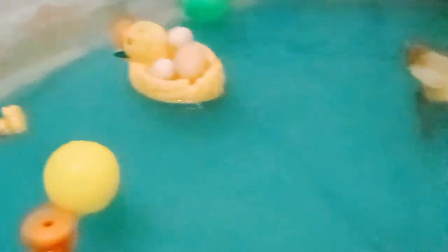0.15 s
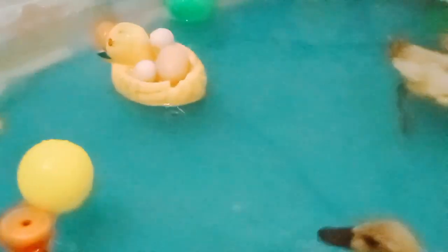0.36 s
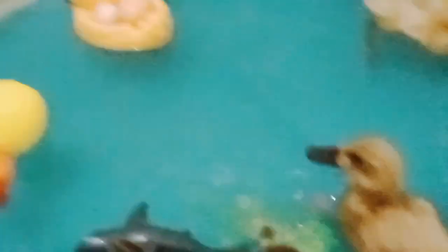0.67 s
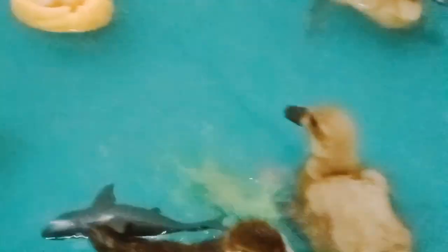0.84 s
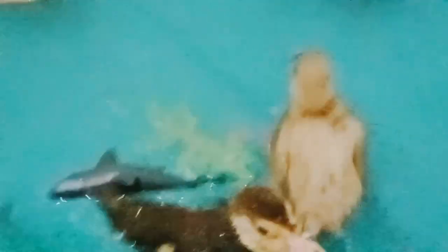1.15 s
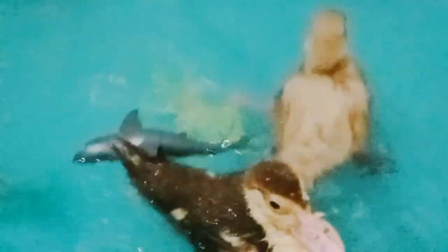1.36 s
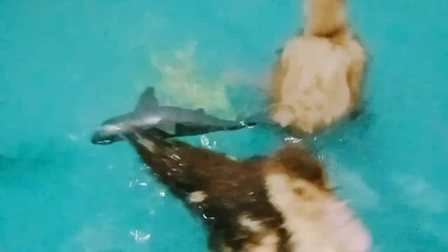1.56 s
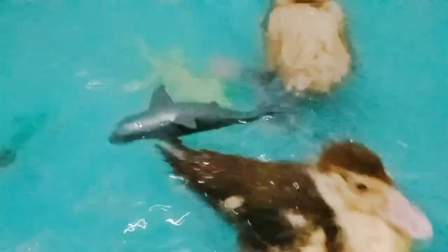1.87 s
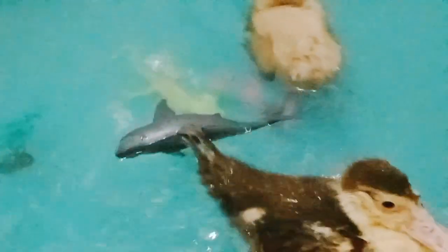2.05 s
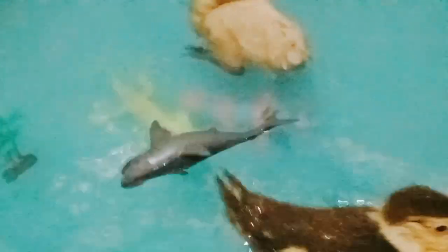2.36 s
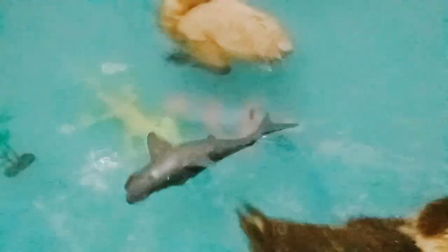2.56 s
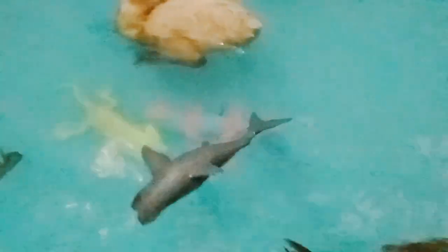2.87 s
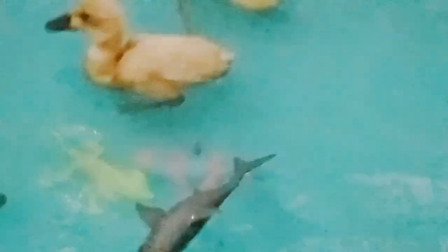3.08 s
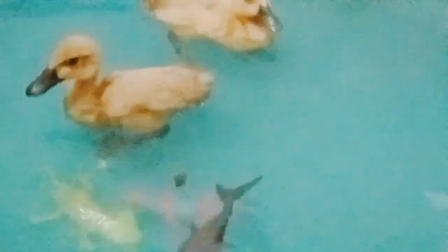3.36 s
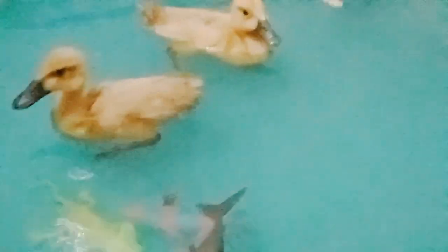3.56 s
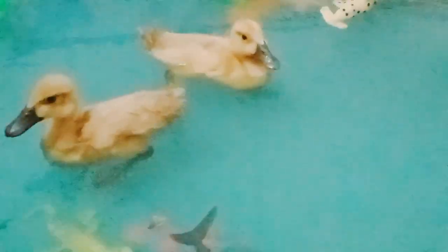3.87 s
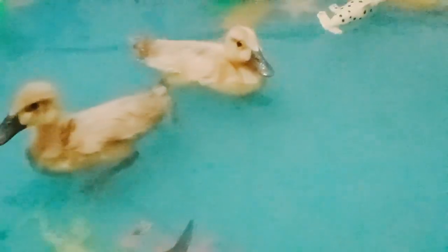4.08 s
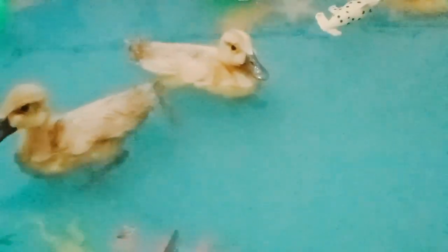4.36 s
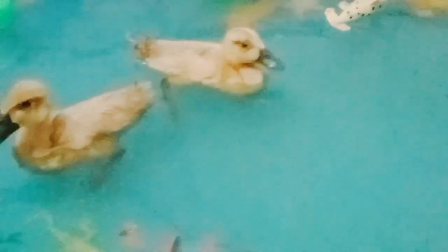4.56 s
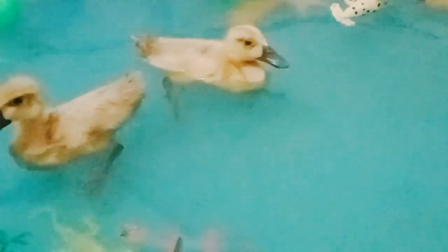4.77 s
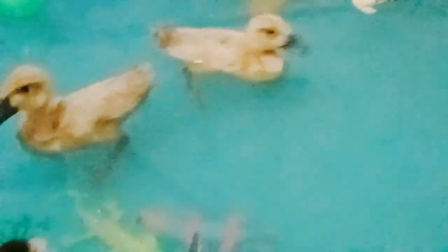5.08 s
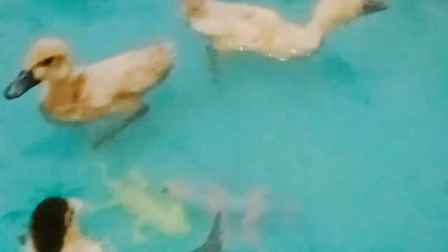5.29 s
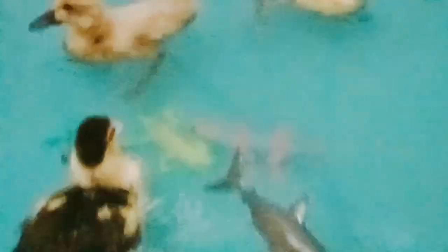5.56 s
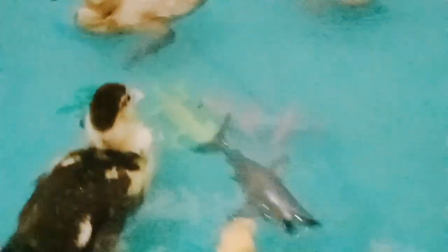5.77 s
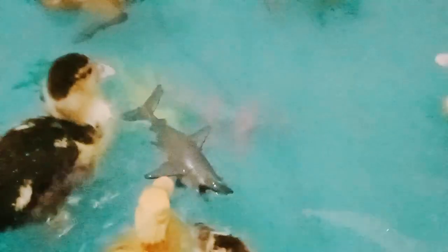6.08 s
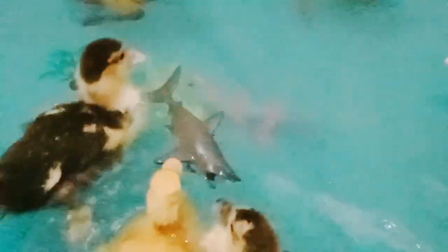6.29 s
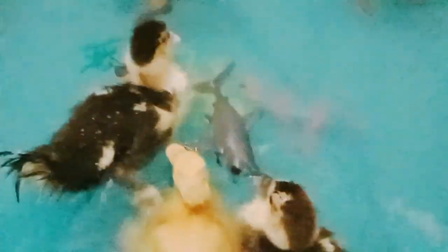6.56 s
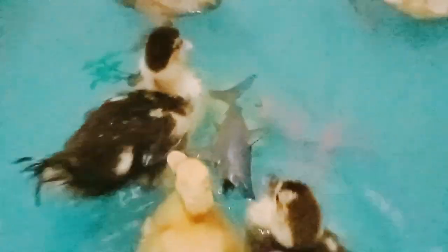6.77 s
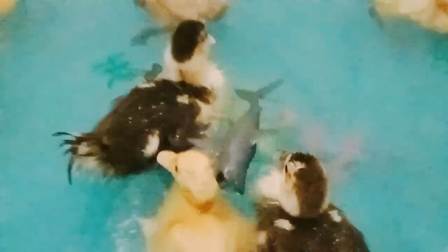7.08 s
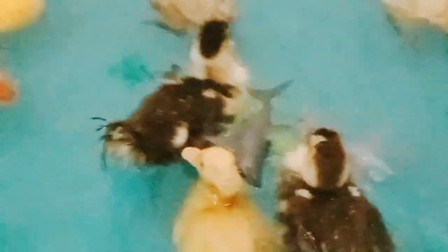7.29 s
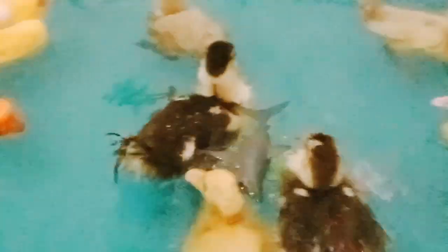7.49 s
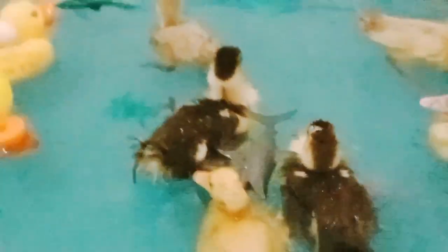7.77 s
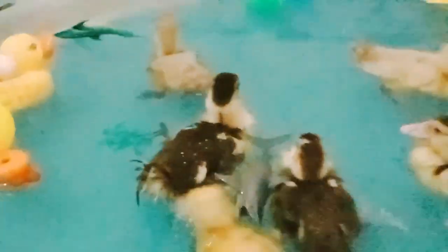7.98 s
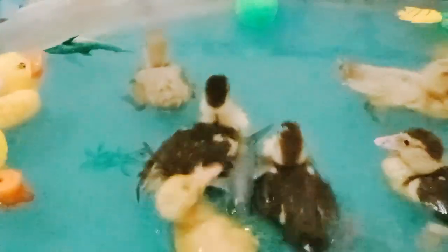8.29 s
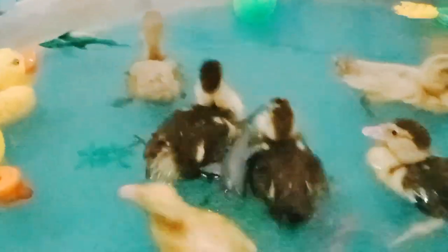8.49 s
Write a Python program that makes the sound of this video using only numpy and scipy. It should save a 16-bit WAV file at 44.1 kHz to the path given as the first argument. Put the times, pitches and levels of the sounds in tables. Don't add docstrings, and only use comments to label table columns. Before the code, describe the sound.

Ducklings paddle in a shallow plastic pool indoors, a metre or two from a phone. Quick thin chirps come first, with two sharp bill raps on the pool wall, then the peeping thickens and one near bird gives loud, regular piercing calls. Afterwards hoarse, doubled squeaks come farther apart and softer. Small water blips, dull handling thumps and a low room hum lie underneath, with a short hard reverb.

```python
import sys
import numpy as np
from scipy import signal
from scipy.fft import rfft, irfft, next_fast_len
from scipy.io import wavfile
from scipy.ndimage import uniform_filter1d, minimum_filter1d

SR = 44100
rng = np.random.default_rng(int(sys.argv[2]) if len(sys.argv) > 2 else 0)


def invert_db(level):
    return 10 ** (np.asarray(level, dtype=float) / 20)


def generate_wav(sig):
    pcm = np.round(np.clip(np.atleast_2d(sig).T, -1, 1) * 32767).astype(np.int16)
    wavfile.write(sys.argv[1], SR, pcm)


N = 381024
t = np.arange(N) / SR


def add(track, sound, s):
    i = int(s * SR)
    track[i:i + len(sound)] += sound[:N - i]


def band(x, hz, width_hz):
    return signal.lfilter(*signal.iirpeak(hz, hz / width_hz, fs=SR), x)


def unit(x):
    return x / np.sqrt(np.mean(x ** 2))


def steep(x, hz, width_hz):
    return unit(band(band(x, hz, width_hz), hz, width_hz))


def walk(rate, size=N):
    k = int(SR / rate)
    steps = np.repeat(rng.standard_normal(max(size, SR // 4) // k + 1), k)[:size]
    return 1.397 * uniform_filter1d(uniform_filter1d(steps, k), k)


def ring(hz, t60, glide=0):
    u = np.arange(int(SR / 4)) / SR
    return np.sin(2 * np.pi * hz * u * (1 + glide * u / t60)) * np.exp(-np.log(1000) * u / t60)


def swell(events):
    return sum(db * np.exp(-((t - s) / width) ** 2) for s, width, db in events)


# frequency in Hz, level in dB per Hz.
AIR = [(25, -24.5), (60, 5), (150, -2.5), (300, 4), (900, -2), (1600, -1.5), (3000, -4.5), (4800, -13),
       (6500, -37.5), (15000, -20.5)]
# frequency in Hz, width in Hz, lift in dB.
AIR_MODES = [(217, 74, 12.5), (382, 3.9, 9.5), (606, 25, 7.5), (850, 100, 11.5)]


def room_air():
    f = np.arange(N // 2 + 1) * SR / N + 1
    hz, db = np.transpose(AIR)
    white = rfft(rng.standard_normal(N)) * invert_db(np.interp(np.log(f), np.log(hz), db))
    white = white * (1 + sum(invert_db(g) / 2 / (1 + ((f - c) / w) ** 2) for c, w, g in AIR_MODES))
    air = 0
    for centre in 30 * 2 ** np.arange(0, 9.5, .5):
        share = np.clip(1 - 2 * np.abs(np.log2(f / centre)), 0, 1)
        air = air + irfft(white * share, N) * invert_db(1.6 * walk(13))
    return unit(air)


# time in seconds, gain in dB.
GAIN = [(0, -1), (1.2, -2), (3.0, -7), (3.8, -7), (4.2, -12.5), (5.65, -12), (5.8, -7), (7.5, -8),
        (8.64, -9)]
# centre in seconds, half width in seconds, lift in dB.
HUM_SWELLS = [(.45, 0.24, 6.5), (3.8, 1, 8.5), (5.8, .12, 16), (7.9, 0.28, 4.5)]
# centre in seconds, half width in seconds, lift in dB.
BOOM_SWELLS = [(.9, 0.078, 5.4), (5.9, 0.23, 14), (6.9, 0.85, 13), (7.9, .45, 17.8), (8.5, 0.59, 13)]


def background():
    hum_hz, boom_hz = 76, 132.5
    air_db, hum_db, boom_db = -51.5, -54, -62
    gain_db = np.interp(t, *np.transpose(GAIN))
    hum = 0.96 * np.sin(2 * np.pi * np.cumsum(hum_hz * (1 + 0.025 * walk(1.8))) / SR)
    hum = hum + 0.72 * unit(band(rng.standard_normal(N), hum_hz, 16.0))
    boom = unit(band(rng.standard_normal(N), boom_hz, 8.8))
    air = invert_db(air_db + gain_db + 3) * room_air()
    hum = invert_db(hum_db + gain_db + swell(HUM_SWELLS)) * hum
    boom = invert_db(boom_db + gain_db + swell(BOOM_SWELLS)) * boom
    return air + hum + boom


# frequency in Hz, decay by 60 dB in seconds.
ROOM_T60 = [(100, 0.51), (800, 0.36), (3400, 0.46), (7000, 0.24)]
# delay in seconds, level in dB.
ECHOES = [(.033, -10)]


def room(x):
    early_s, early_db = 0.02, -2.5
    hz, t60 = np.transpose(ROOM_T60)
    u, tail = t[:SR], 0
    for centre in 100 * 2 ** np.arange(0, 7.5, .5):
        decay = np.exp(-np.log(1000) * u / np.interp(np.log(centre), np.log(hz), t60))
        tail = tail + band(rng.standard_normal(SR), centre, centre / 2.7) * decay
    onset = np.clip((u - .002) / 0.0031, 0, 1)
    tail = tail * onset * (1 + invert_db(early_db) * np.exp(-u / early_s))
    tail = tail / np.sqrt(np.sum(tail ** 2))
    for s, db in ECHOES:
        add(tail, np.array([invert_db(db)]), s)
    return signal.fftconvolve(x, tail)[:N]


def damped_tones(events, cycles, glide):
    out = np.zeros(N)
    for s, db, hz in events:
        onset = np.minimum(t[:SR // 4] * hz / 0.78, 1)
        add(out, invert_db(db) * ring(hz, cycles / hz, glide) * onset, s)
    return out


# start in seconds, peak in dB, pitch in Hz.
THUMPS = [(0.997, -30.5, 146), (2.947, -30.5, 94.2), (3.473, -34, 74.6), (3.87, -20, 116),
          (5.742, -39, 84.8), (5.905, -26, 136), (5.992, -18, 142), (6.579, -28.5, 87), (7.516, -24.5, 120)]


def thumps():
    return damped_tones(THUMPS, 5.3, -.1)


# start in seconds, peak in dB, pitch in
# Hz.
BLIPS = [(.592, -29, 1890), (1.36, -39.5, 240), (2.166, -36.5, 1420), (3.465, -40, 591), (4.025, -44, 587),
         (4.585, -44, 626), (4.855, -39.5, 628), (5.137, -38, 605), (5.423, -40, 615), (6.048, -31.5, 1860),
         (7.455, -32.5, 245), (8.415, -41, 580), (6.017, -44.5, 1390), (1.225, -32.5, 1570),
         (1.263, -34, 2110), (1.29, -37, 2000), (8.035, -40.5, 1300), (8.122, -39, 1720),
         (7.305, -32, 1900)]


def water_blips():
    return damped_tones(BLIPS, 13, 0.052)


# start in seconds, peak in dB, lift of middle and of upper modes in dB.
KNOCKS = [
    (1.6771, -8, -8, 9),
    (1.7755, 2, 0, 0),
]
# frequency in Hz, level in dB, decay by 60 dB in seconds.
WALL = [(287, -5, 0.061), (640, -14, 0.03), (820, 5, 0.03), (1000, 0, 0.025), (1470, 0, 0.014),
        (1950, -6, 0.013)]


def knocks():
    out = np.zeros(N)
    for s, db, middle_db, upper_db in KNOCKS:
        body = 0
        for hz, mode_db, t60 in WALL:
            lift_db = upper_db * (hz > 1100) + middle_db * (700 < hz < 1100)
            body = body + invert_db(mode_db + lift_db) * ring(hz, t60)
        body = body * np.minimum(t[:len(body)] / .003, 1)
        tick = rng.standard_normal(len(body)) * np.exp(-t[:len(body)] / .003)
        add(out, invert_db(db) * (body / 2 + invert_db(-22) * tick), s)
    return signal.sosfilt(signal.butter(3, (230, 4600), "band", fs=SR, output="sos"), out)


# start and length in seconds, level in dB, centre in Hz.
CRACKS = [(0.11, 0.051, -43, 1970), (0.384, 0.026, -60, 1680), (0.636, 0.038, -40, 1560),
          (1.29, 0.071, -42.5, 1900), (2.851, 0.021, -48.5, 1675), (5.379, 0.025, -44, 1980),
          (6.104, 0.056, -43.5, 1945), (6.727, 0.034, -39, 2010), (7.381, 0.031, -41, 2077),
          (8.415, 0.015, -49, 2050), (8.492, 0.03, -33, 2900)]
# start in seconds, level in dB, centre in Hz.
FLIPS = [(2.057, -37.5, 3850), (2.507, -42.5, 3860), (3.106, -31.5, 3300), (4.103, -37.5, 4330),
         (4.417, -42.5, 4150), (4.71, -40.5, 4090), (4.977, -36.5, 4350), (5.263, -37, 4200),
         (5.545, -45, 4300), (4.853, -55, 1180), (5.134, -49, 1190), (5.421, -52.5, 1300),
         (7.288, -48, 3210), (7.392, -50, 3320)]


def cracks():
    out = np.zeros(N)
    for s, length, db, hz in CRACKS:
        noise = rng.standard_normal((2, SR // 8))[:, :int(length * SR)]
        spiky = noise[0] * invert_db(24 * uniform_filter1d(noise[1], size=40))
        throat = steep(spiky, hz, 1100) + 0.39 * steep(spiky, 1100, 810) + 1.5 * steep(spiky, 3500, 1000)
        add(out, invert_db(db) * throat * signal.windows.tukey(len(spiky), .6), s)
    for s, db, hz in FLIPS:
        puff = steep(rng.standard_normal(SR // 50), hz, 470)
        add(out, invert_db(db) * puff * np.hanning(len(puff)), s)
    return signal.sosfilt(signal.butter(4, 4900, fs=SR, output="sos"), out)


LOWEST_HZ = 1730


def outline(s, length, from_hz, to_hz, db, scoop, flick, shape):
    whisper_db = -44.5
    scoop_s, share, bend, flick_s, *fades = shape
    share = np.clip(share, .05, .95)
    soft = db - np.array(fades) * max(db - whisper_db, 8)
    bend_hz = bend * (from_hz + share * (to_hz - from_hz))
    return [(s - scoop_s, max(from_hz * scoop, LOWEST_HZ), soft[0]),
            (s, from_hz, soft[1]),
            (s + share * length, bend_hz, db),
            (s + length, to_hz, soft[2]),
            (s + length + flick_s, max(to_hz * flick, LOWEST_HZ), soft[3])]


# frequency in Hz, level in dB.
THROAT = [(4200, -15.5), (5200, 1), (6500, -5.5), (7500, -11.5), (8500, 1.5), (11000, -5.5)]
# frequency in Hz, level in dB.
WINDPIPE = [(1800, 1), (2600, -1), (3300, -0.5), (3900, 0.5), (4600, -5)]
# time in seconds, second harmonic in dB, third and higher in dB.
FACING = [(1.2, 3, 2.5), (1.9, 20, -1.5), (2.4, 15.5, 3.5), (2.51, 4.5, 11.5), (2.6, 10.5, 1),
          (3.3, -4.5, -4), (7.499, 6.5, 0), (8.2, 18, 0)]


def peep(rows, half_db, second_db, third_db, wobble, flutter_db):
    s, hz, db = np.transpose(rows)
    edge_s = .004
    u = np.arange(s[0] - edge_s, s[-1] + edge_s, 1 / SR)
    size = len(u)
    edge = np.clip(np.minimum(u - u[0], u[-1] - u) / edge_s, 0, 1)
    effort = np.interp(u, s, invert_db(.4 * db)) ** (1 / .4) * edge * invert_db(flutter_db * walk(140, size))
    pitch = uniform_filter1d(np.interp(u, s, hz), SR // 150, mode="nearest")
    slope = np.gradient(pitch) * SR
    phase = 2 * np.pi * np.cumsum(pitch * (1 + wobble * walk(150, size))) / SR
    half = invert_db(half_db + 8 * walk(50, size) + (pitch - 3800) / 60)
    tone = np.sin(phase) + half * (np.sin(phase / 2) + 0.04 * np.sin(3 * phase / 2))
    facing = np.transpose(FACING)
    for k, overtone_db in ((2, second_db), (3, third_db), (4, third_db - 5.0)):
        throat_db = np.interp(k * pitch, *np.transpose(THROAT))
        throat_db = throat_db + np.interp(s[0], facing[0], facing[min(k - 1, 2)])
        tone += invert_db(overtone_db + throat_db + 2 * walk(53, size)) * np.sin(k * phase)
    grain = 1 + flutter_db / 30 * walk(1200, size)
    scoop = invert_db(-13 * np.clip(slope / 40000, 0, 1) * np.clip((3200 - pitch) / 300, 0, 1))
    rush_db = -3.5 * np.clip(-slope / 30000 - 1, 0, 1)
    colour = invert_db(rush_db + np.interp(pitch, *np.transpose(WINDPIPE)))
    return np.sqrt(2) * effort * grain * scoop * colour * tone


def sum_tones(z):
    return np.real(z * z) / (np.abs(z) + 1e-4)


# body start in seconds, body length in seconds, from Hz, to Hz, loudest dB.
HOOKS = [(.88, 0.017, 3450, 2940, -21), (.997, 0.019, 3455, 2940, -20.5), (1.137, .021, 3450, 2970, -21),
         (2.653, 0.02, 3430, 2896, -22.5)]
SLIDES = [(.853, 0.012, 2760, 4300, -34), (.972, 0.013, 4220, 4500, -41), (1.112, 0.013, 4270, 4430, -37),
          (1.238, 0.036, 3950, 4450, -43), (2.626, .016, 4100, 4400, -33.5),
          (1.362, 0.017, 3750, 2730, -20.5), (3.624, .014, 3870, 3380, -32), (3.35, 0.058, 3158, 3324, -20),
          (1.786, 0.024, 3004, 3655, -24.5), (1.806, 0.064, 3630, 2817, -32),
          (2.14, 0.043, 3265, 2034, -26), (2.24, 0.061, 3230, 1960, -23.5),
          (2.355, 0.068, 3430, 2076, -21.5), (2.924, 0.072, 3625, 2032, -15.5),
          (3.0, 0.066, 2916, 1880, -33), (3.105, 0.078, 3090, 1930, -12.5), (3.25, 0.085, 3120, 1983, -6.5),
          (3.552, 0.027, 3006, 1698, -23.5), (4.02, 0.038, 3750, 3440, -27),
          (4.205, 0.059, 3434, 2954, -27), (8.063, 0.015, 3000, 3670, -42.5),
          (8.155, 0.014, 3080, 3510, -35), (8.168, 0.02, 3800, 3920, -38.5)]
DROPS = [(3.558, 0.056, 2712, 2565, -12), (4.053, 0.057, 2850, 2510, -19), (4.285, .06, 2807, 2580, -17.5),
         (4.525, .062, 2880, 2556, -18), (4.77, .064, 2860, 2540, -19.5)]
SNAPS = [(2.512, .06, 3385, 2522, -10), (2.755, 0.062, 3457, 2862, -23), (3.64, 0.072, 3402, 3212, -15),
         (3.8, 0.072, 2875, 2471, -13.5), (7.893, 0.039, 2960, 2850, -37.5), (8.085, .056, 3460, 3370, -32),
         (8.198, 0.023, 3120, 2917, -30), (8.462, 0.05, 3154, 2974, -27)]
ARCHES = [(1.545, 0.042, 3230, 2976, -32), (2.05, 0.074, 3275, 3010, -31.5),
          (2.675, .03, 1950, 1933, -39.5), (6.545, 0.054, 2126, 1977, -41.5)]
SETTLES = [(2.285, 0.0091, 3670, 3050, -27), (2.885, .03, 3210, 3060, -21.5), (3.22, .04, 3284, 3208, -24),
           (3.293, 0.045, 3354, 3034, -10), (3.345, 0.0094, 3706, 3370, -27.5),
           (3.935, .045, 3214, 3337, -17)]
RISES = [(7.865, 0.036, 3020, 3410, -36.5), (8.435, 0.0083, 3080, 3266, -35.5)]
HELD = [(1.275, .037, 3995, 3980, -19.5), (3.517, 0.08, 3190, 2980, -21), (3.805, 0.064, 3177, 3145, -10.5),
        (4.068, 0.071, 3277, 3341, -5)]
LONG = [(4.338, 0.086, 3200, 3430, -4.5), (4.615, 0.091, 3143, 3524, -5), (4.878, 0.11, 3139, 3588, -6),
        (5.164, .112, 3128, 3505, -3.5), (5.447, 0.108, 3117, 3448, -3.5)]
DIPS_FROM_ABOVE = [(.025, 0.083, 3794, 3957, -18.5), (.61, 0.05, 3600, 3600, -27),
                   (2.205, 0.072, 3690, 4065, -24), (2.755, .075, 3680, 4090, -20.5),
                   (3.43, 0.09, 3850, 4070, -25.5), (6.05, 0.059, 3616, 3920, -15.5)]
DIPS_FROM_BELOW = [(6.646, .072, 3740, 3850, -15), (7.301, .075, 3820, 3950, -15)]
SCRAPS = [(.004, 0.003, 3380, 4260, -20), (.666, 0.0098, 4350, 2040, -32), (1.312, 0.032, 4026, 4240, -28),
          (1.335, .02, 4300, 4920, -36.5), (5.045, 0.084, 3730, 3610, -25), (5.1, 0.041, 3600, 2094, -35.5),
          (5.36, 0.046, 3465, 4150, -29.5), (5.43, 0.06, 4060, 3830, -37), (6.168, 0.012, 3800, 2157, -32),
          (6.384, 0.039, 3710, 3284, -37)]
SPLIT_RISES = [(.496, 0.092, 2815, 3270, -27), (5.935, 0.13, 3595, 3296, -23.5),
               (7.64, 0.1, 3956, 3670, -30)]
SPLIT_SETTLES = [(5.975, 0.054, 4005, 3660, -20), (6.445, 0.074, 3850, 3630, -17),
                 (6.91, .09, 4064, 3440, -21.5)]
SPLIT_LINES = [(.535, 0.035, 3300, 3950, -29.5), (.57, 0.056, 3900, 4320, -27),
               (.585, .04, 3350, 3910, -34.5), (.555, 0.073, 3950, 4790, -43),
               (5.968, 0.087, 3050, 3250, -32), (6.413, 0.043, 3620, 3680, -13),
               (6.44, 0.08, 3400, 3250, -30), (6.878, 0.15, 3580, 3270, -27.5),
               (.578, 0.016, 3770, 3680, -36.5), (6.9, 0.11, 3230, 3056, -39),
               (6.905, 0.058, 2810, 2920, -50.5), (7.64, .1, 3790, 3290, -35.5),
               (7.655, 0.063, 3060, 3050, -49.5)]
# scoop in seconds, loudest at share of body, pitch bend there as a ratio,
# flick in seconds, then share of the way to a whisper at scoop start, body start, body end, flick end.
HOOK = (.011, 0.43, 1, .017, 0.54, 0.1, 0.28, 0.98)
SLIDE = (.001, 0.28, 1.01, .001, .7, 0.6, 0.75, 1.5)
DROP = (0.0012, 0.84, 1.02, 0.025, 0.34, 0.32, 0.037, 0.98)
SNAP = (.001, .8, 1.015, 0.017, 0.41, 0.53, 0.088, 0.92)
ARCH = (0.02, 0.23, 1.04, 0.025, 0.6, 0.15, 0.13, 1.6)
SETTLE = (0.024, 0.093, 1.001, 0.013, 1.3, 0.09, .05, 0.84)
RISE = (0.013, 1, 1.01, 0.00088, 0.39, 0.3, 0.046, .1)
HOLD = (.001, 0.4, 1.01, .001, .4, 0.099, 0.1, 0.5)
CALL = (0.017, 0.44, 1.035, 0.017, 0.64, 0.22, 0.28, 0.98)
DIP_DOWN = (.014, .5, 0.93, 0.011, 0.86, 0.12, 0.35, 0.49)
DIP_UP = (.014, 0.65, .94, 0.011, 1, 0.2, 0.05, 0.7)
SCRAP = (.001, 0.58, 1.01, 0.0011, 0.21, 0.14, 2.5, 0.58)
SPLIT_RISE = (0.015, 0.39, 1.0, .001, 1, 0.55, 0.044, .15)
SPLIT_SETTLE = (0.024, 0.25, 0.97, 0.016, 1, 0.037, 0.44, 0.4)
SPLIT_LINE = (.001, 0.6, 0.99, 0.0015, 0.5, 0.36, 0.6, 0.4)
# peeps, scoop start as a ratio of from Hz, flick end as a ratio of to Hz, shape.
PEEPS = [(HOOKS, 1.26, .76, HOOK), (SLIDES, 1, 1, SLIDE), (DROPS, 1, .72, DROP), (SNAPS, 1, .62, SNAP),
         (ARCHES, .62, .57, ARCH), (SETTLES, 1.2, .9, SETTLE), (RISES, .65, 1, RISE)]
STEADY = [(HELD, 1, 1, HOLD), (LONG[2:], .5, .5, CALL), (LONG[:2], .88, .5, CALL)]
HOARSE = [(DIPS_FROM_ABOVE, 1.11, 1.13, DIP_DOWN), (DIPS_FROM_BELOW, .8, 1.15, DIP_UP),
          (SCRAPS, 1, 1, SCRAP)]
DOUBLE = [(SPLIT_RISES, .68, 1, SPLIT_RISE), (SPLIT_SETTLES, 1.07, 1, SPLIT_SETTLE),
          (SPLIT_LINES, 1, 1, SPLIT_LINE)]
# kinds of peep, half-pitch in dB, second and third harmonic in dB, pitch wobble as a share,
# flutter in dB, send to the room in dB.
VOICES = [(PEEPS, -60.5, -40, -46.5, .009, 4.1, -5.5), (STEADY, -84, -40.5, -49, 0.0038, 0.66, -7.5),
          (HOARSE, -37, -47, -56, 0.011, 3.98, -5), (DOUBLE, -50, -64, -47.5, 0.009, 2.6, -7.5)]


def ducklings():
    near, far = np.zeros(N), np.zeros(N)
    for kinds, *voice, room_db in VOICES:
        track = np.zeros(N)
        for peeps, *kind in kinds:
            for row in peeps:
                corners = outline(*row, *kind)
                add(track, peep(corners, *voice), max(corners[0][0] - .004, 0))
        if kinds == DOUBLE:
            z = signal.hilbert(track, next_fast_len(N))[:N]
            track = track + invert_db(-43.0) * sum_tones(z)
        near, far = near + track, far + track * invert_db(room_db)
    return near, far


def scene():
    near, far = ducklings()
    rasp, raps, water = cracks(), knocks(), water_blips()
    wet = room(far + invert_db(-2.5) * rasp + invert_db(-5) * raps + invert_db(4.0) * water)
    return (near + rasp + raps + water + wet + thumps() + background())[None]


def top_cut(x):
    return signal.sosfilt(signal.butter(12, 15500, fs=SR, output="sos"), x)


def record(dry):
    ceiling, hiss_db, haze_db = .85, -86.0, -76
    dull = signal.sosfilt(signal.butter(2, 5000, fs=SR, output="sos"), dry)
    dull = dull + invert_db(hiss_db) * rng.standard_normal(dry.shape)
    peak = -minimum_filter1d(-np.abs(dull), size=881)
    gain = uniform_filter1d(uniform_filter1d(np.minimum(ceiling / peak, 1), size=441), size=441)
    haze = invert_db(haze_db) * uniform_filter1d(peak, size=441) * rng.standard_normal(dry.shape)
    return top_cut((dull + haze) * gain)


dry = scene()
out = record(dry)
generate_wav(out)
```